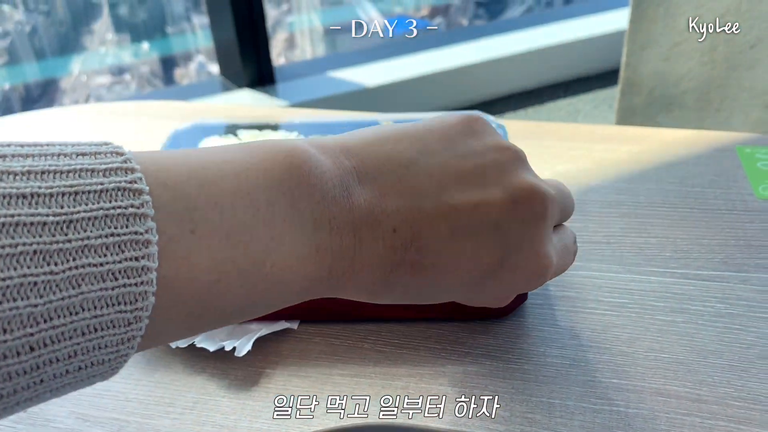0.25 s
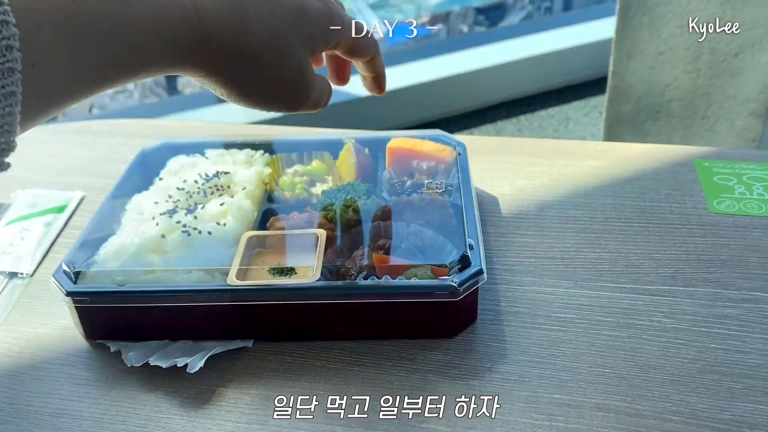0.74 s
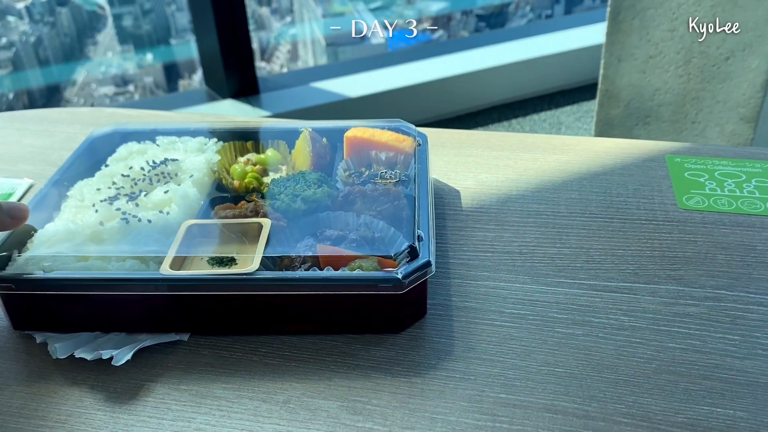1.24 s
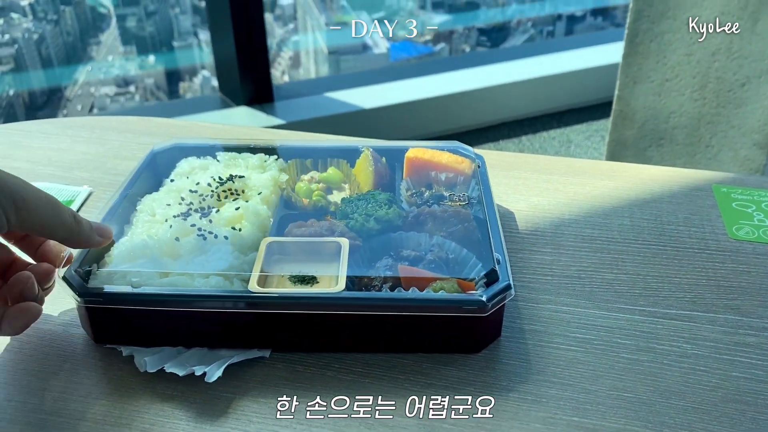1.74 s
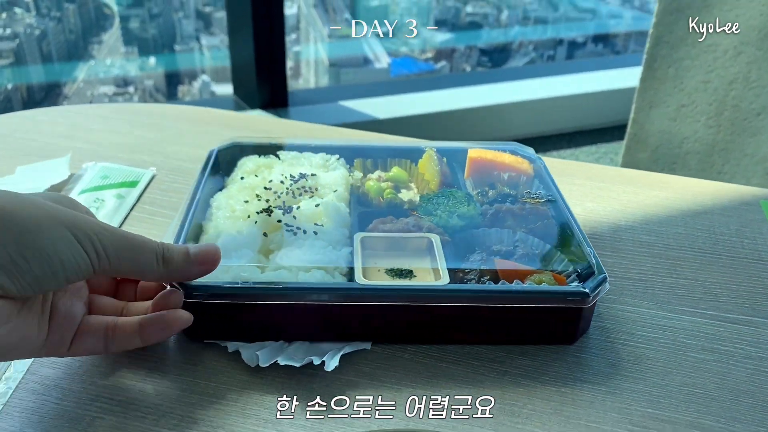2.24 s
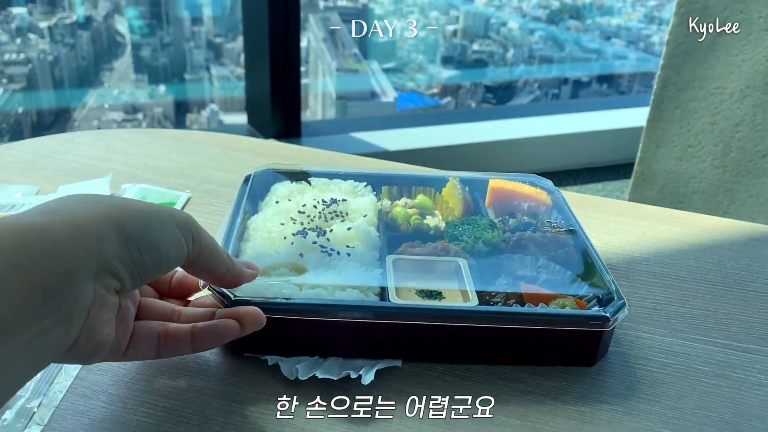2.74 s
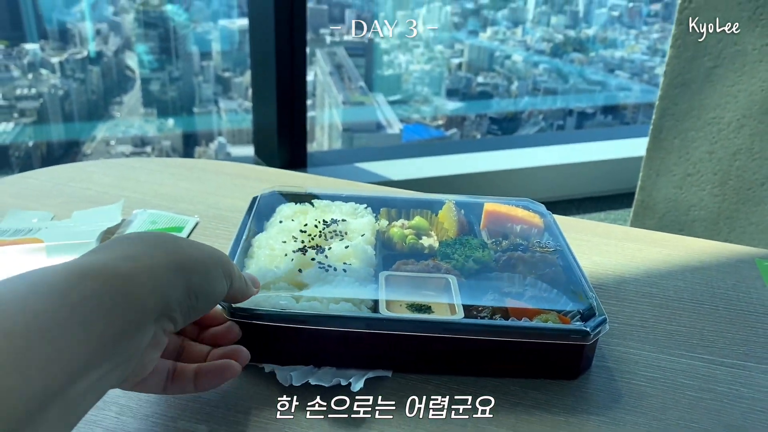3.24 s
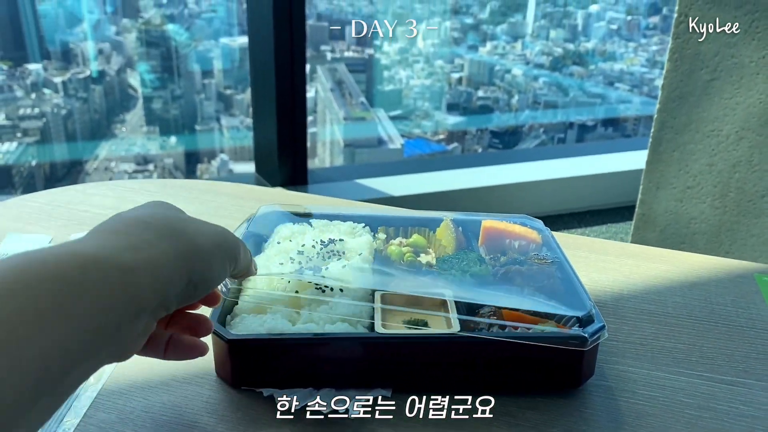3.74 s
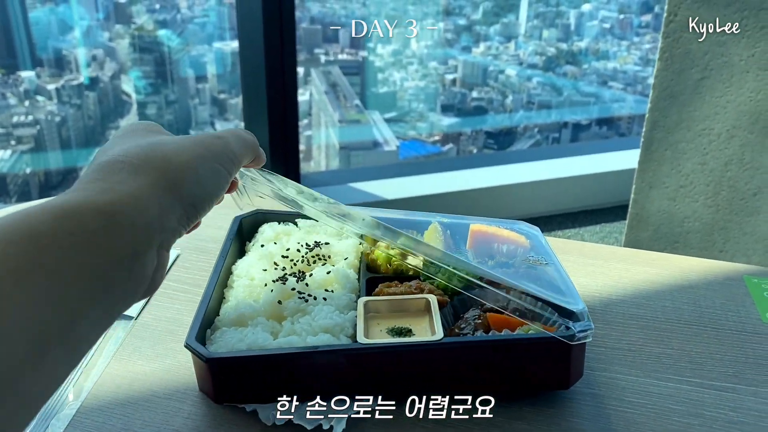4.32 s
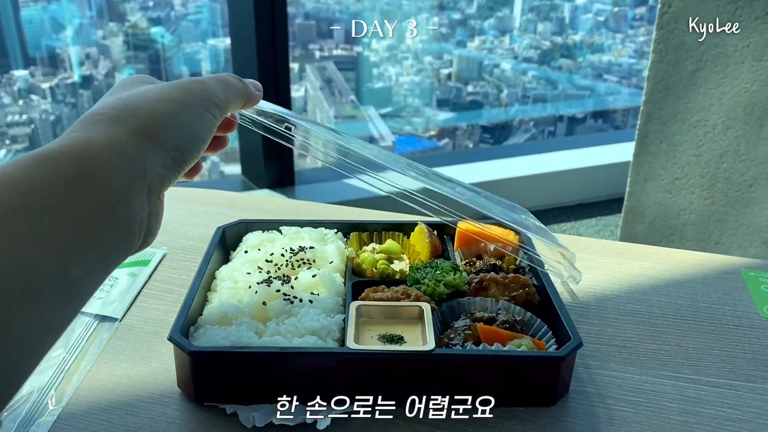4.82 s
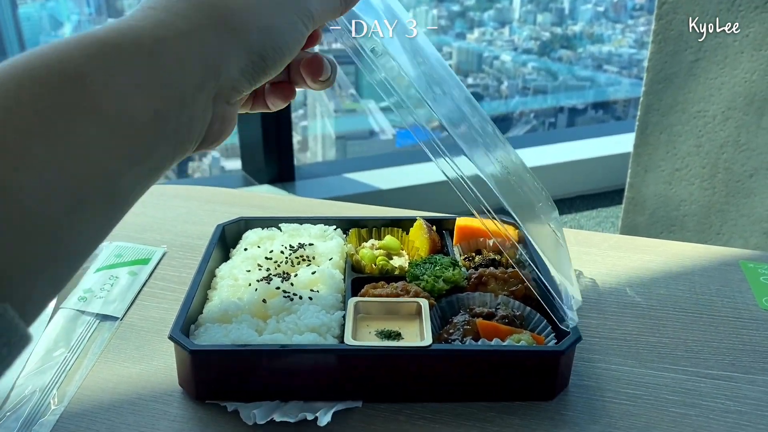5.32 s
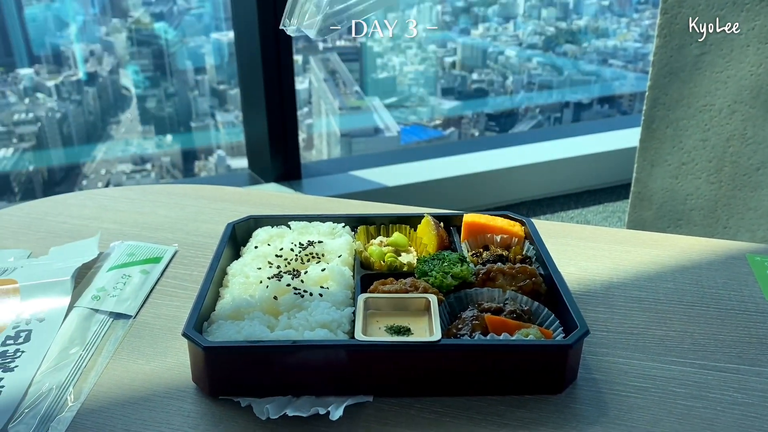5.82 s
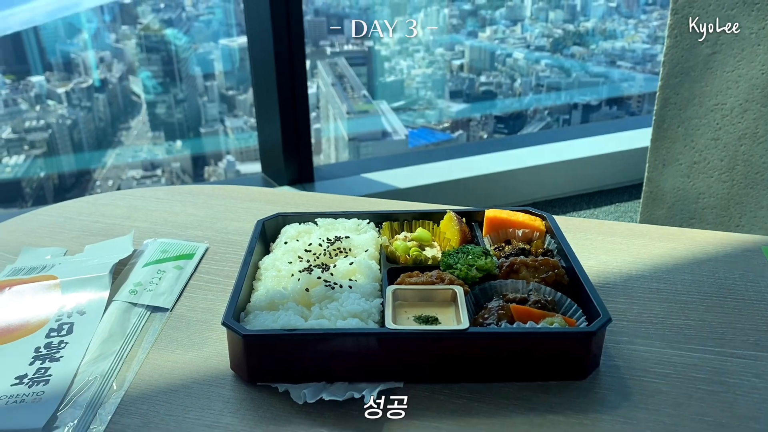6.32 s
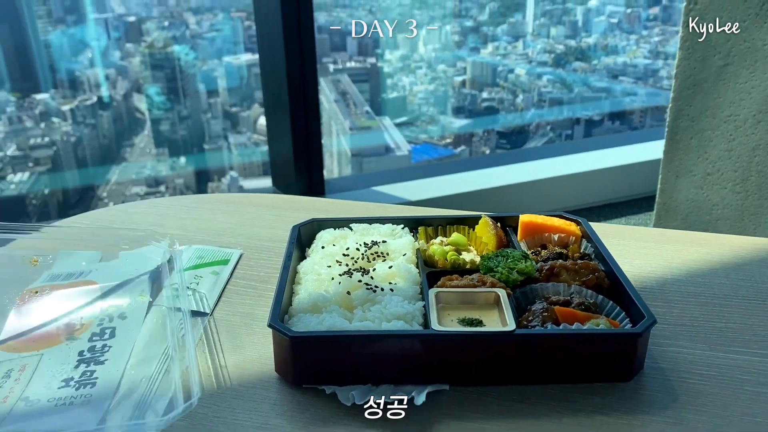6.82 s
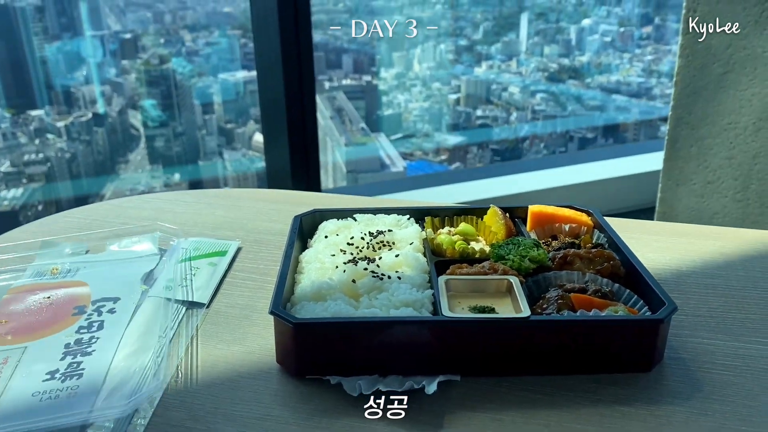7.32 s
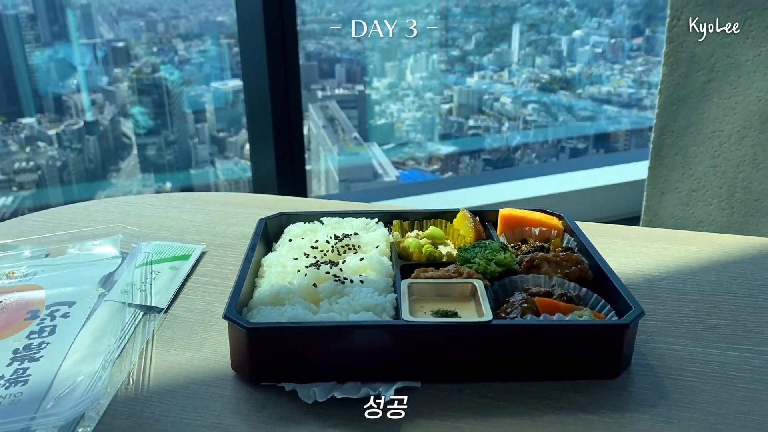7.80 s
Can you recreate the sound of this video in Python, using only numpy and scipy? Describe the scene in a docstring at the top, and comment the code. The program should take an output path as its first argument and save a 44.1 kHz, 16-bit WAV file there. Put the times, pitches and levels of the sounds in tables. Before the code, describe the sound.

Close-up handling of a brittle takeaway lid: dry finger squeaks, scattered ticks and sharp buckling snaps, a little left of centre. The rim gives way in several loud, bright cracks with a dull desk bump and a scrape of the box. Afterwards mostly soft air rumble, then tiny rustles and taps as the lid is set down. Small, quiet office, short reverberation.

```python
"""Prying a plastic lid off a box

A thin plastic lid is pried off a food box on a desk in a quiet office, close to a pair of microphone ports.
Ventilation rumbles as coloured stereo noise; hand and box bump the desk as dying sines.
Fingers and rim rub and the box slides: dense random slips filtered by body colours.
The rim buckles in snaps and ticks: millisecond slip bursts excite ringing bands, sheet modes and a pitched patch."""
import sys
import numpy as np
from scipy import signal
from scipy.fft import rfft, irfft, next_fast_len
from scipy.io import wavfile

SR = 44100
rng = np.random.default_rng(int(sys.argv[2]) if len(sys.argv) > 2 else 0)


def wav_record(signal):
    """Record a signal, one row per channel, as 16-bit PCM in the file named by sys.argv[1]."""
    frames = np.transpose(np.atleast_2d(signal))
    bounded = np.clip(frames, -1, 1)
    # unit amplitude maps onto the largest positive 16-bit level
    quanta = np.round(bounded * 32767).astype(np.int16)
    wavfile.write(sys.argv[1], SR, quanta)


N = 355446


def from_db(db):
    """Amplitude gain of a level in dB."""
    return 10 ** (np.asarray(db) / 20)


def rms_one(x):
    """Scale to rms 1."""
    return x / np.sqrt(np.mean(x ** 2) + 1e-20)


def panned(db):
    """Left and right gains for a left-minus-right level gap."""
    return from_db([[db / 2], [-db / 2]])


def at_hz(points, hz):
    """Interpolate a curve on a log-frequency axis."""
    p = np.array(points)
    return np.interp(np.log(np.maximum(hz, 1)), np.log(np.maximum(p[:, 0], 1)), p[:, 1])


def coloured(x, response):
    """Filter x by a response given as a function of Hz."""
    size = next_fast_len(x.shape[-1] + 4096)
    hz = np.arange(size // 2 + 1) * SR / size
    return irfft(rfft(x, size) * response(hz), size)[..., :x.shape[-1]]


def band(x, low_hz, high_hz):
    """Butterworth band-pass."""
    sos = signal.butter(3, [low_hz, high_hz], "band", fs=SR, output="sos")
    return signal.sosfilt(sos, x + 1e-18)


def drift(rate_hz):
    """Slow random curve of rms 1: noise through two equal poles, computed every 40 samples."""
    step = 40
    r = np.exp(-2 * np.pi * rate_hz * step / SR)
    noise = rng.standard_normal(N // step + 2002)
    slow = signal.lfilter([1], [1, -2 * r, r * r], noise)[2000:]
    return np.interp(np.arange(N) / step, np.arange(len(slow)), rms_one(slow))


def grains(per_s, spread_db, length):
    """Tiny slips at random moments, a few much larger than the rest; rms 1."""
    sizes_db = spread_db * np.minimum(rng.exponential(1, length), 5)
    sizes = from_db(sizes_db) * rng.choice([-1, 1], length)
    return rms_one(sizes * (rng.random(length) < per_s / SR))


# ventilation spectrum: f/Hz, relative level/dB
AIR_SPECTRUM = [(12, -55), (20, -34), (38, -9.5), (113, -4), (210, -17), (248, -19.5), (347, -24.5),
                (472, -20.5), (513, -22.5), (574, -30.5), (624, -28.5), (923, -48), (11400, -72.5),
                (16000, -71.5)]
# left-right likeness of the ventilation: f/Hz, likeness/0..1
AIR_LIKENESS = [(40, 1), (200, 0.84), (800, 0.46), (4000, 0.18)]
AIR_DB = -50


def ventilation():
    """Air noise as mid and side: alike in both ports in the bass, less so above, gently wavering."""
    mid, side = rng.standard_normal((2, N + SR))   # half a second spare at each end

    def mid_gain(hz):
        return from_db(at_hz(AIR_SPECTRUM, hz)) * np.sqrt(1 + at_hz(AIR_LIKENESS, hz))

    def side_gain(hz):
        return from_db(at_hz(AIR_SPECTRUM, hz)) * np.sqrt(1 - at_hz(AIR_LIKENESS, hz))

    stereo = coloured(mid, mid_gain) + coloured(side, side_gain) * [[1], [-1]]
    level = from_db(AIR_DB + 0.1 * drift(6.6))
    return level * rms_one(stereo[:, SR // 2:SR // 2 + N])


# room decay: f/Hz, t60/s
OFFICE_T60 = [(100, 0.9), (500, 0.51), (2000, 0.31), (6000, 0.17), (14000, 0.42)]
OFFICE_DB = -18.5


def office(x):
    """Diffuse tail, its own in each channel: octave noise bands with their own decays, duller on top."""
    t, tail = np.arange(SR // 2) / SR, 0
    white = rng.standard_normal((2, SR // 2))
    for hz in 90 * 2.0 ** np.arange(8):
        decay = from_db(-60 * t / at_hz(OFFICE_T60, hz) - 1.3 * hz / 5000)
        tail = tail + band(white, hz / np.sqrt(2), hz * np.sqrt(2)) * decay
    tail = tail * (1 - np.exp(-t / 0.006))   # reflections thicken over the first milliseconds
    tail = tail / np.sqrt(np.sum(tail ** 2, axis=1, keepdims=True))
    mono = x.mean(axis=0, keepdims=True)
    return from_db(OFFICE_DB) * signal.fftconvolve(mono, tail, axes=1)[:, :N]


# soft bumps of hand and box through the desk: t/s, relative level/dB, f/Hz, t60/s
THUMPS = [(0.241, -28, 74.8, 0.07), (.37, -44, 106.7, 0.35), (0.487, -34.5, 62, 0.11),
          (0.595, -37.5, 142, .15), (1.46, -35.5, 131.5, 0.071), (2.449, -36, 101, 0.15),
          (2.974, -42, 192, 0.13), (3.829, -33, 142, 0.1), (4.399, -25, 170.3, .1),
          (4.403, -29, 66.5, 0.25), (4.532, -35, 100, 0.089), (4.751, -27, 65.3, 0.31),
          (4.75, -23, 101.6, 0.12), (4.792, -25.5, 88.1, 0.071), (5.459, -38, 106, .13),
          (5.70, -37.5, 73, 0.11)]


def thumps():
    """A soft push sets the desk top swinging: a sine with a soft onset and exponential decay."""
    out, t = np.zeros(N + SR // 2), np.arange(SR // 2) / SR
    for s, level_db, hz, t60_s in THUMPS:
        onset = 1 - np.exp(-t / 0.0025)
        decay = from_db(level_db + 3.5 - 60 * t / t60_s)
        out[round(s * SR):][:len(t)] += np.sin(2 * np.pi * hz * t) * decay * onset
    return out[:N] * panned(1.5)


SWELL_DB = 30   # rise over one swell time, fall over one fade time
ARCH = 1.4   # exponent: roundness of a stroke's top


def contact(rows, level_db):
    """Gain over time: each stroke arches up to its level and down again; powers add."""
    s, swell_s, fade_s = np.array(rows).T[:3, :, None]
    t = np.arange(0, N + 64, 64) / SR
    away = np.where(t < s, (s - t) / swell_s, (t - s) / fade_s)
    arch_db = np.reshape(level_db, (-1, 1)) - SWELL_DB * away ** ARCH
    power = from_db(2 * arch_db).sum(axis=0)
    return np.interp(np.arange(N) / SR, t, np.sqrt(power))


def friction(spectrum, per_s, spread_db, clumps, crinkle=0):
    """Dense slips in uneven clumps, plus lone crinkles, through a body colour; rms 1."""
    slips = grains(per_s, spread_db, N) * clumps + crinkle
    return rms_one(coloured(slips, lambda hz: from_db(at_hz(spectrum, hz))))


# friction colours of plastic scrape, squeeze and hiss, and of the desk: f/Hz, relative level/dB
SCRAPE_SPECTRUM = [(300, -51), (600, -8), (1100, 7.5), (2200, -2.5), (3000, -19), (6000, -56)]
SQUEEZE_SPECTRUM = [(700, -52), (1500, -17.5), (2400, -2), (3500, -2.5), (4300, -3.5), (5500, -10),
                    (12000, -53.5)]
HISS_SPECTRUM = [(1500, -43.5), (3500, -8.5), (5000, -7.5), (8000, -4), (11000, -4.5), (13000, -4.5),
                 (16000, -16)]
DESK_SPECTRUM = [(100, -29.5), (200, 1), (450, 5.5), (900, 4), (1300, -2), (1900, -22), (2800, -44.5),
                 (4500, -73.5)]
# skin and rim on plastic: t of firmest contact/s, swell/s, fade/s, squeeze level/dB,
# brightness/dB (raises hiss, lowers scrape); levels before panning
STROKES = [(.12, 1, 0.18, -57, -2), (.26, 0.078, 0.044, -65, -3), (.41, .03, 0.068, -50.5, -17),
           (.66, 0.042, 0.86, -76, -3.5), (1.3, 0.38, 0.32, -65, 0), (1.44, 0.016, 0.06, -61, 2.5),
           (1.56, 0.046, 0.53, -69, 1), (1.87, 0.084, 0.21, -54.5, -4), (2.1, 0.04, 0.24, -60.5, -0.5),
           (2.24, 0.19, 0.11, -71, -1), (2.47, 0.031, 0.34, -80.5, 2.5), (2.719, .06, 0.12, -71, -5),
           (2.93, 0.084, 0.25, -65, -4.5), (3.2, 0.13, 0.11, -88.5, -2.5), (3.48, 0.26, 0.18, -78, -6.5),
           (3.9, 0.047, 0.79, -75.5, -2), (4.26, 0.052, 0.053, -74, -0.5), (4.32, 0.072, 0.36, -74, -14.5),
           (4.62, .08, .15, -63.5, -8), (4.789, 0.039, 0.097, -29.5, -5.5), (4.89, .14, 0.12, -38, -6),
           (5.12, 0.14, .14, -67, -2), (5.24, .02, 0.048, -78.5, 0.5), (5.34, 0.044, 0.26, -60.5, 0),
           (5.421, 0.072, 0.055, -53, 8), (5.53, 0.055, 0.049, -60, 1), (5.61, .1, 0.064, -84.5, -34),
           (6.47, .12, 0.095, -80, 6), (6.8, 0.092, 0.24, -72.5, -1), (6.879, 0.026, 0.071, -57.5, 3.5),
           (7.029, .08, .15, -71.5, 2.5), (7.11, 0.024, 0.17, -64.5, 1), (7.27, 0.081, 0.14, -73, 2.5),
           (7.42, 0.058, 0.096, -80.5, -1), (7.7, .13, .2, -84.5, -11), (7.86, .3, .12, -94, -9)]
# box or lid dragged over the desk: t of firmest contact/s, swell/s, fade/s, level before panning/dB
DRAGS = [(.035, 0.022, 0.5, -57.5), (1.2, 0.25, 0.21, -57.5), (2.452, 0.016, 0.065, -31),
         (2.502, .05, 0.13, -49), (4.76, 0.011, 0.14, -25.5), (4.88, 0.071, .22, -35),
         (5.342, 0.082, .12, -56), (5.49, 0.08, 0.13, -39.5), (5.6, 0.23, 0.18, -39)]
REST_UNTIL_S, REST_DB = 3.9, -87   # fingers stay on the box, barely moving
GRIP_DB = 1.6   # rms unevenness of the grip
HAND_PAN_DB = 2   # the hand works left of the microphone


def rubbing():
    """Plastic scrape, squeeze and hiss share strokes and grip unevenness; the desk drag is duller."""
    grip_db = GRIP_DB * drift(21.3)
    crinkle = from_db(-14.5) * grains(90, 5.5, N)
    level_db, bright_db = np.array(STROKES).T[3:]
    rest = from_db(REST_DB) * (np.arange(N) < REST_UNTIL_S * SR)

    scrape_gain = contact(STROKES, level_db - bright_db - 1.5) + rest * from_db(5)
    scrape_clumps = from_db(grip_db + 0.98 * drift(35))
    scrape = scrape_gain * friction(SCRAPE_SPECTRUM, 6000, 4.6, scrape_clumps, 0.42 * crinkle)

    squeeze_gain = contact(STROKES, level_db) + rest
    squeeze_clumps = from_db(grip_db + 3.0 * drift(26))
    squeeze = squeeze_gain * friction(SQUEEZE_SPECTRUM, 8900, 1.9, squeeze_clumps, crinkle)

    hiss_gain = contact(STROKES, level_db + bright_db - 4) + rest * from_db(-1)
    hiss_clumps = from_db(grip_db + 2.0 * drift(35))
    hiss = hiss_gain * friction(HISS_SPECTRUM, 9700, 2.7, hiss_clumps, crinkle)

    drag_gain = contact(DRAGS, np.array(DRAGS)[:, 3])
    drag = drag_gain * friction(DESK_SPECTRUM, 4000, 3.1, from_db(1.3 * drift(41)))
    return panned(HAND_PAN_DB) * (scrape + squeeze + drag) + hiss


# strongest modes of the sheet: f/Hz, width/Hz, relative prominence/dB before the 0.6 scaling
LID_MODES = [(647, 270, -10), (1134, 54, 12), (2170, 37, -7.5), (2220, 25, 1.5), (3520, 19, -1.5),
             (3810, 16, -1.5), (4250, 210, -11), (4260, 16, -4.5), (5200, 250, -9), (5600, 110, -20),
             (7000, 52, -11), (7940, 87, -11), (8600, 28, -15), (9660, 300, -11), (9600, 78, -1),
             (10630, 110, -9.5), (11400, 110, -16.5), (11640, 53, -16)]
MODES_DB = 2.5   # offset of all modes against the dense ringing


def lid_modes(hz):
    """Causal response of the sheet: flat dense ringing plus two-pole modes of alternating sign."""
    z, out = np.exp(-2j * np.pi * hz / SR), 1
    for k, (mode_hz, width_hz, db) in enumerate(LID_MODES):
        r = np.exp(-np.pi * width_hz / SR)
        poles = 1 - 2 * r * np.cos(2 * np.pi * mode_hz / SR) * z + r * r * z * z
        mode = (1 - r * r) / 2 * (1 - z * z) / poles
        out = out + (-1) ** k * from_db(MODES_DB + 0.6 * db) * mode
    return out


# the sheet buckles or is tapped: t/s, relative body level/dB, then hollow knock/dB, clack/dB and
# treble tick/dB re body, f of the patch that gives/Hz, burst decay constant/ms
SNAPS = [(0.033, -52.5, 8.5, 0, -19, 3530, 2.8), (0.121, -39, -21, -12, -11, 3530, 2.5),
         (0.189, -49, -7, 6, 3.5, 1030, 2.3), (0.228, -45, 2, -13, -11, 920, 3.2),
         (0.358, -44, 4, -14, -5, 1304, 3.2), (0.375, -25, -1, -14, -9, 4440, 1.7),
         (0.387, -18.5, -4, -13, -3, 1187, 3.3), (0.442, -33.5, -8, -17, -19.5, 1060, 1.3),
         (0.592, -12, -6, -12, 2, 5510, 3.45), (0.643, -34.5, -9, -8.5, 3, 1376, 4.8),
         (0.962, -57, 12, -10.5, -23.5, 1027, 1.9), (1.047, -59.5, -6, 6.5, 18, 3570, 2.5),
         (1.164, -54, 3.5, 2.5, -5, 1300, 2.5), (1.205, -49, 8, -2, -1, 1563, 2.8),
         (1.246, -56.5, 2, 2, -11.5, 2033, 2.3), (1.285, -54, 17.5, 8, -9, 3100, 1.7),
         (1.364, -46.5, -3, -16, -10.5, 1280, 5.3), (1.411, -34.5, -1.5, -16.5, -13, 1577, 4.6),
         (1.46, -27, -1, 4.5, 8.5, 1517, 4.5), (1.503, -18.5, -14, -3, 7.5, 5820, 2.7),
         (1.781, -40, -3.5, -20.5, -18.5, 840, 1.9), (1.864, -29.5, -4.5, 1, 4, 1090, 3.9),
         (1.964, -46, 1, -5, -5, 3180, 3.3), (1.976, -44.5, 1, -8, -2, 860, 1.8),
         (2.035, -56.5, -7, 2, 6, 3480, 1.8), (2.144, -37.5, -3, 1, 0.5, 1410, 1.7),
         (2.198, -54, 5, -4, -1, 1670, 2.5), (2.223, -37, -10, -3, -7.5, 1360, 1.9),
         (2.266, -55.5, 4, -4, 2, 1740, 2.5), (2.357, -60.5, 2.5, -2, -1.5, 802, 2.8),
         (2.409, -65, 16, -11, -17.5, 1167, 2.7), (2.445, -45, -0.5, -36, -15.5, 1017, 2.5),
         (2.477, -55.5, -3, -26, -0.5, 934, 2.2), (2.67, -32.5, -6, -2.5, -26.5, 1076, 2),
         (2.894, -46, -7.5, -11.5, -11.5, 1330, 2.5), (2.915, -40, -8.5, -9.5, -7.5, 2450, 3.1),
         (2.942, -40, -5, -13, -16, 2160, 2.3), (2.959, -41.5, 5.5, -1, 1, 1490, 1.5),
         (2.975, -14.5, -13, -4.5, -7, 1230, 1.6), (3.126, -46.5, 8.5, 5.5, -1.5, 1340, 2.9),
         (3.21, -45, 6.5, -6, -8.5, 850, 2), (3.291, -68, -6, -6.5, 1.5, 1306, 2.5),
         (3.304, -61.5, 4, 7, 3.5, 3670, 1.9), (3.329, -35, -0.5, -19, -15.5, 1270, 3.1),
         (3.355, -54, 3, 1, -5, 1040, 1.8), (3.385, -47, -5, 7.5, 3.5, 2950, 1.25),
         (3.437, -61, 3, 3, 7, 4660, 1.5), (3.459, -55, 1, 4, 6.5, 5250, 2.2),
         (3.506, -38.5, -0.5, 4.5, 1.5, 1670, 2.1), (3.553, -32.5, -10, 2.5, 2.5, 3700, 2.45),
         (3.63, -45, 1, -13, -16, 1090, 2.8), (3.826, -14, -7.5, -3.5, -0.5, 1680, 2.5),
         (3.987, -46.5, -11.5, -3.5, 9, 2070, 2.1), (4.237, -53, -9, 2, 0.5, 3680, 3.3),
         (4.253, -55, 0, 3.5, 3.5, 3650, 3.1), (4.303, -49.5, 21, -4, 3.5, 1137, 0.83),
         (4.327, -43.5, -3, 0.5, 4, 1960, 4.3), (4.399, -2, -10.5, 4, -2.5, 1304, 0.83),
         (4.529, -11, -7, -6.5, -9.5, 2270, 1.26), (4.75, -9.5, -8, 1, -3, 1220, 2),
         (4.786, -18.5, -19, 2, -7.5, 1304, 2.7), (4.863, -27, -18, -13, -17.5, 1112, 2.5),
         (4.881, -22.5, -27, -8, -14.5, 1140, 5.2), (4.94, -31, -16, -17.5, -14, 1040, 2.5),
         (4.996, -45.5, -5, -12, -3, 1020, 2.5), (5.08, -40.5, -10, -12, -8.5, 1274, 3),
         (5.132, -47, 12, -12.5, -9, 1030, 2.5), (5.302, -56.5, -11.5, -4.5, -14, 1060, 2.9),
         (5.317, -52.5, -5, -2, -9, 1050, 2.2), (5.41, -45, -8, -11.5, 4, 4080, 4.5),
         (5.444, -49, -2, -14, 10, 1033, 2.9), (6.867, -42, -9, -6.5, 5.5, 6280, 3.25),
         (6.897, -45.5, 4.5, -5.5, 0.5, 4280, 2.4), (6.999, -65.5, 6, -0.5, 6.5, 4740, 2.5),
         (7.028, -66, 5, 2, 9, 5040, 2.3), (7.098, -46, 3, 3, -1.5, 1850, 2.1),
         (7.268, -66, 5, -1, -1, 861, 2.6), (7.382, -60, 2.5, -1.5, -11, 2550, 2.6)]
# bands of sheet and box: f_low/Hz, f_high/Hz, t60/s before burst scaling,
# ring/dB before RINGING_DB, relative level/dB, left-right gap/dB
BANDS = [(225, 560, 0.25, -12, -3, 1), (634.3, 2130, 0.14, -3, -8.5, 4), (1912, 3800, 0.14, -14, -5.5, 4),
         (4270, 6650, 0.088, -3.5, -12, 4), (7000, 16000, 0.15, -20, -0.5, 1.5)]
RINGING_DB = -4.5
RING_GAIN_PER_MS = 0.11   # added share of ring t60 per ms of burst
PATCH_DB, PATCH_CYCLES = -5.5, 24   # the patch falls 60 dB in this many of its own cycles


def snaps():
    """Each buckle is a slip burst dying in milliseconds; bands ring on, lows rising more slowly."""
    out, t = np.zeros((2, N)), np.arange(SR // 3) / SR
    tracks, patches = np.zeros((len(BANDS), N + len(t))), np.zeros(N + len(t))
    for s, body_db, hollow_db, clack_db, tick_db, patch_hz, burst_ms in SNAPS:
        at = round(s * SR)
        slips, ringing = grains(10000, 3.9, len(t)), rng.standard_normal((2, len(t)))
        slips[24] += 6.0   # sharp first give, 0.5 ms in
        burst = slips * np.exp(-t / (burst_ms / 1000))
        lasting = 0.86 + RING_GAIN_PER_MS * burst_ms   # longer buckles ring longer
        rel_db = [hollow_db, 0, clack_db, tick_db, tick_db]
        for k, (low_hz, _, t60_s, ring_db, loud_db, _) in enumerate(BANDS):
            rise = 1 - np.exp(-t / (0.00016 + 0.1 / low_hz))
            ring = ringing[k % 2] * from_db(ring_db + RINGING_DB - 60 * t / (t60_s * lasting))
            gain = from_db(body_db + rel_db[k] + loud_db)
            tracks[k, at:at + len(t)] += gain * rise * (burst + ring)
        # two-pole resonator at the patch pitch
        r, w = from_db(-60 * patch_hz / PATCH_CYCLES / SR), 2 * np.pi * patch_hz / SR
        patch = signal.lfilter([0, 1], [1, -2 * r * np.cos(w), r * r], burst + 1e-18)
        patch_gain = from_db(body_db + max(0, clack_db, tick_db) + PATCH_DB)
        patches[at:at + len(t)] += patch_gain * patch / np.abs(patch).max()
    for track, (low_hz, high_hz, *_, pan_db) in zip(tracks, BANDS):
        width_gain = np.sqrt(SR / 2 / (high_hz - low_hz))   # equal power for any bandwidth
        out += band(track[:N], low_hz, high_hz) * width_gain * panned(pan_db)
    return coloured(out, lid_modes) + patches[:N] * panned(4.0)


# phase between ports: f/Hz, left lead/rad (tapered to zero below 250 Hz)
PORTS = [(250, 0.5), (500, -0.74), (780, 2.5), (1290, 1.28), (1640, 1.35), (2240, 1.09), (4570, 1.29),
         (6720, -1), (7580, -1.77), (8010, -2), (9300, -5), (13000, -8.5), (14000, -10), (16600, -15.5)]


def scene():
    """Near sounds reach the ports with a phase gap; the room tail is diffuse, bass rumble and thumps alike in both."""
    near = snaps() + rubbing()

    def port_phase(hz):
        lead_rad = at_hz(PORTS, hz) * np.minimum(hz / 250, 1)
        return np.exp(.5j * np.outer([1, -1], lead_rad))

    return coloured(near, port_phase) + office(near) + thumps() + ventilation()


# microphone response: f/Hz, level/dB
MIC_RESPONSE = [(100, 0.5), (7000, 6), (8400, 8), (10500, 7.5), (12500, 2), (13400, -9), (15000, -10.5),
                (17000, -10.5)]
CUTOFF_HZ = 17400


def record(dry):
    """Microphone colour, tanh-rounded peaks, then a steep low-pass."""
    heard = coloured(dry, lambda hz: from_db(at_hz(MIC_RESPONSE, hz)))
    rounded = 0.76 * np.tanh(heard / 0.93)
    return signal.sosfilt(signal.cheby2(14, 95, CUTOFF_HZ, fs=SR, output="sos"), rounded)


dry = scene()
out = record(dry)
wav_record(out)
```